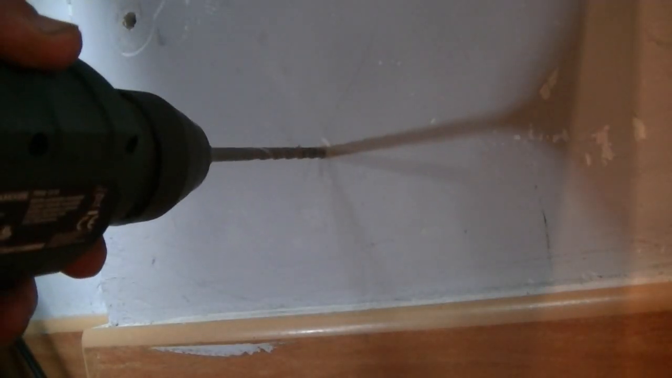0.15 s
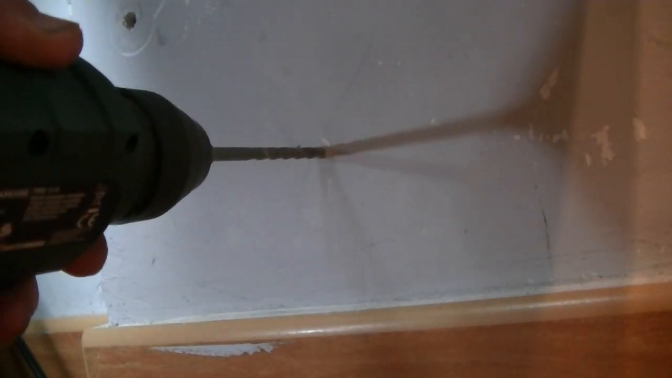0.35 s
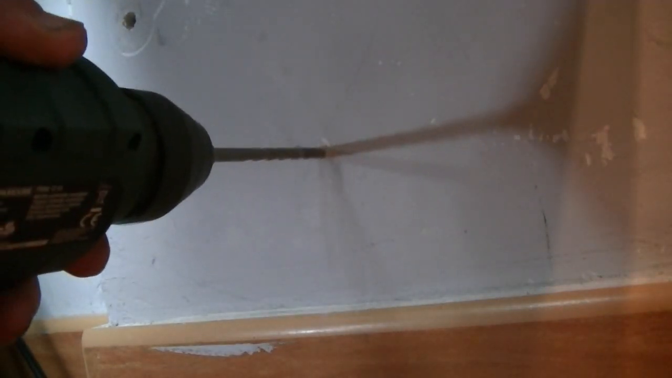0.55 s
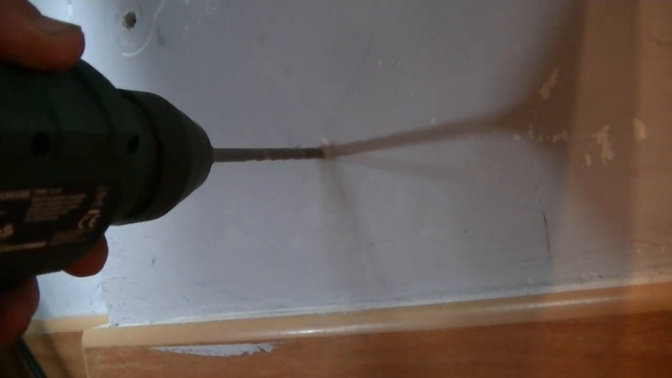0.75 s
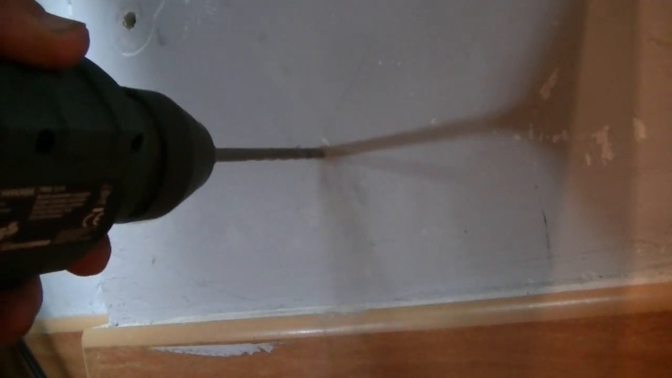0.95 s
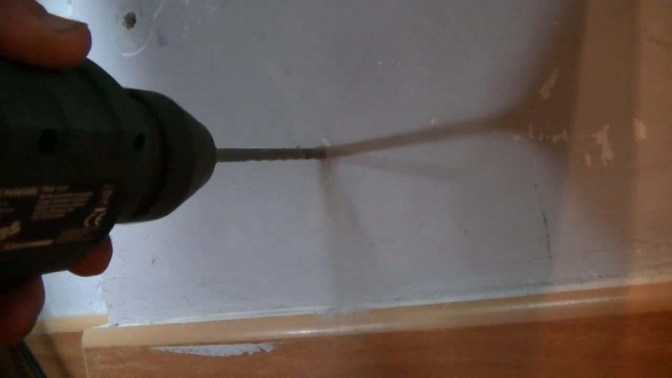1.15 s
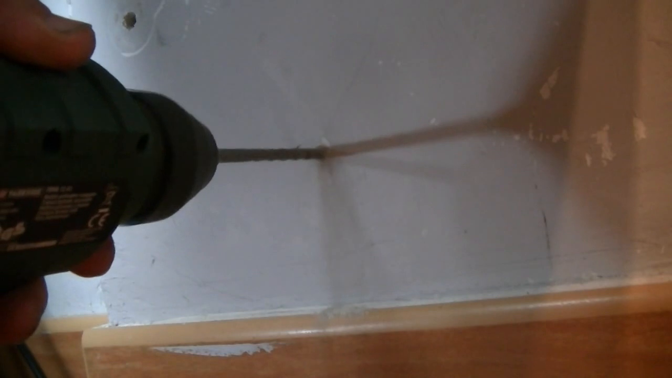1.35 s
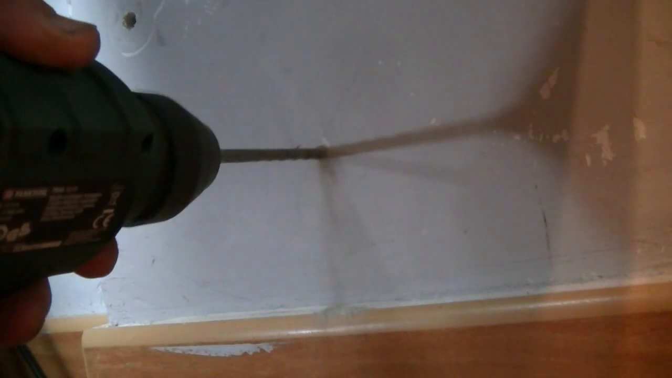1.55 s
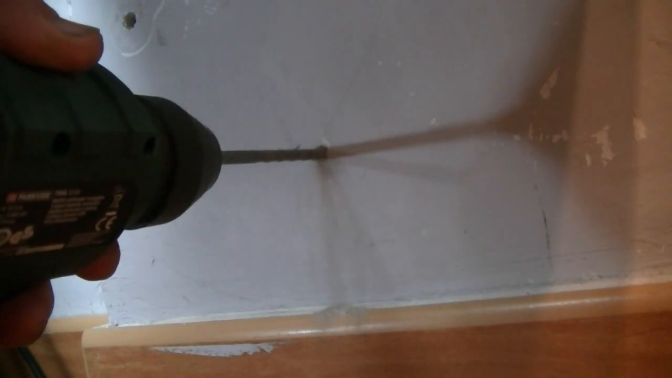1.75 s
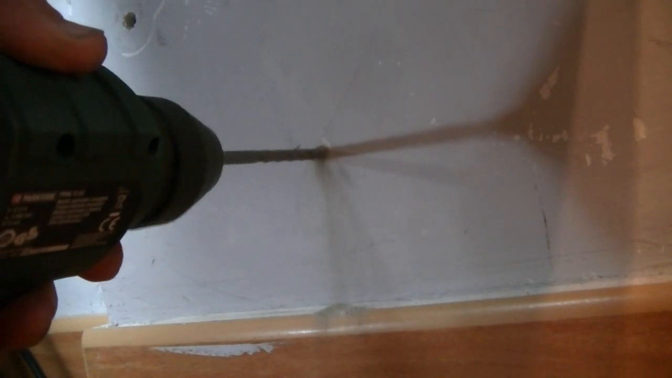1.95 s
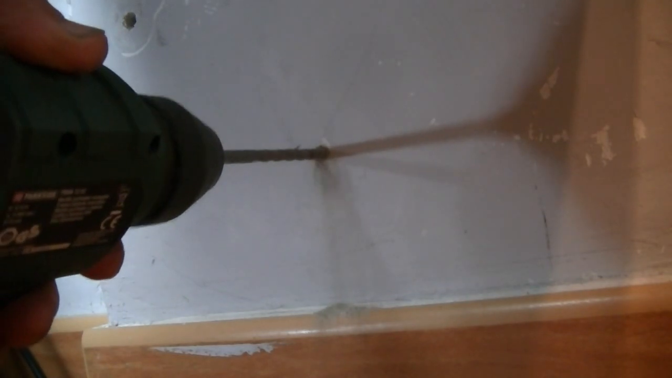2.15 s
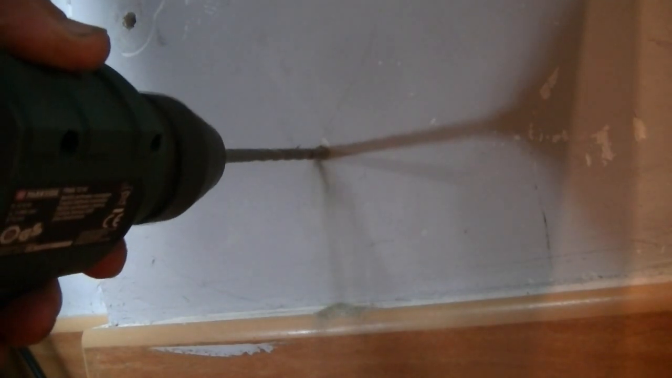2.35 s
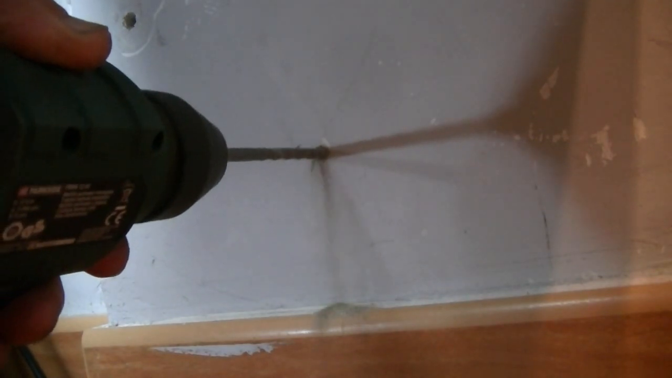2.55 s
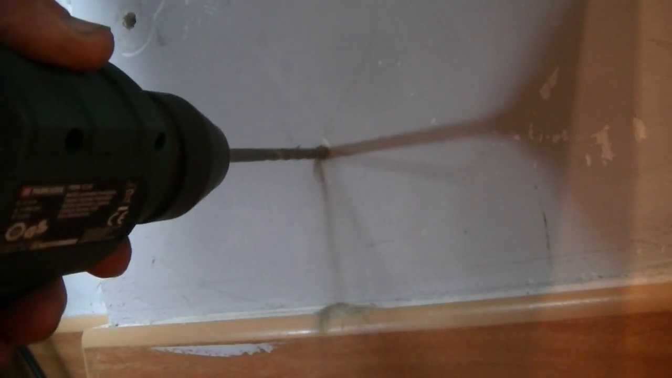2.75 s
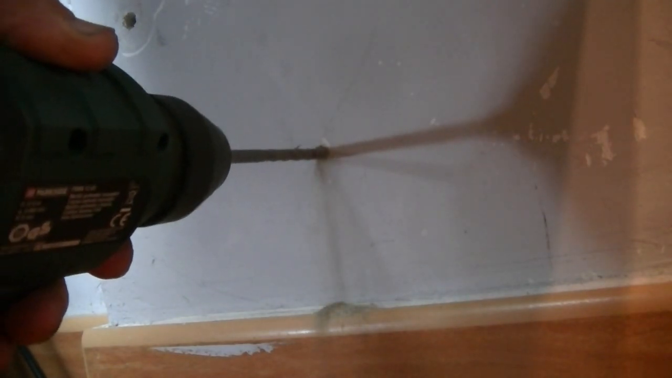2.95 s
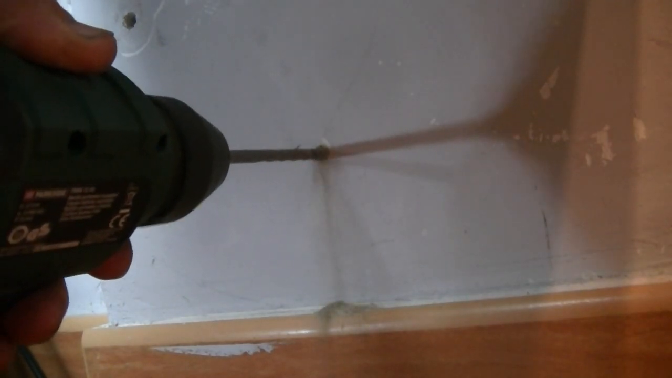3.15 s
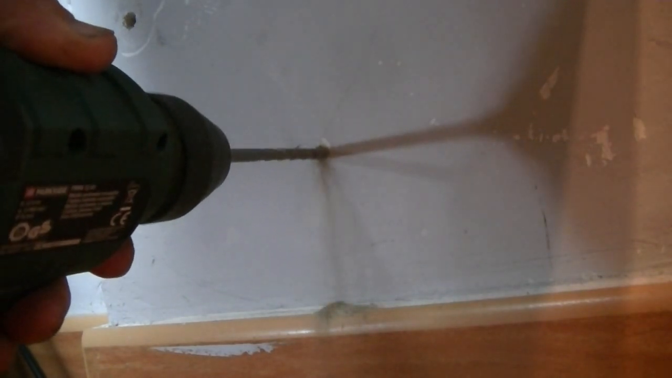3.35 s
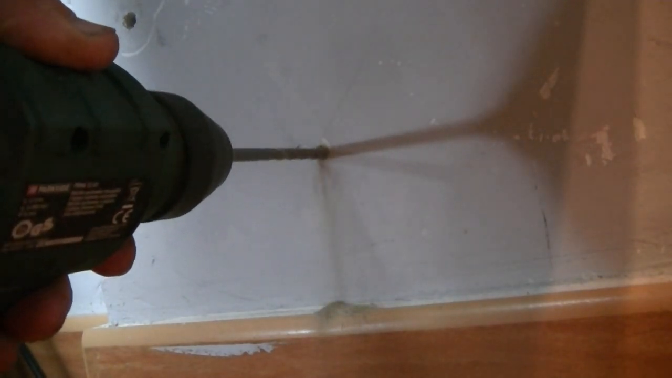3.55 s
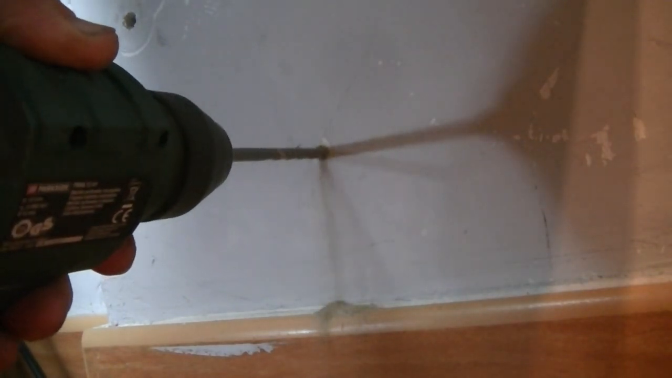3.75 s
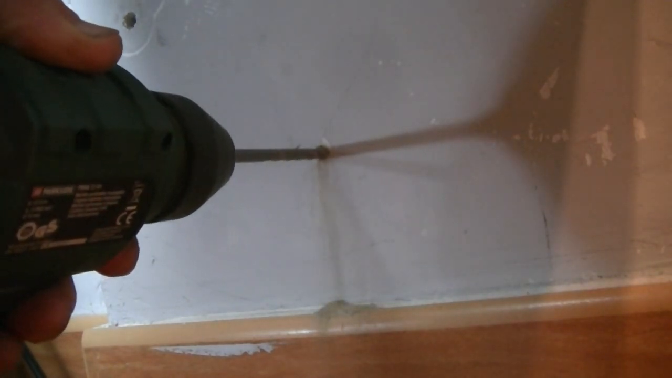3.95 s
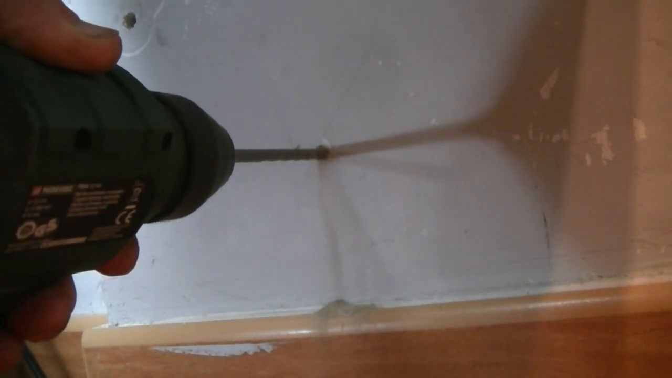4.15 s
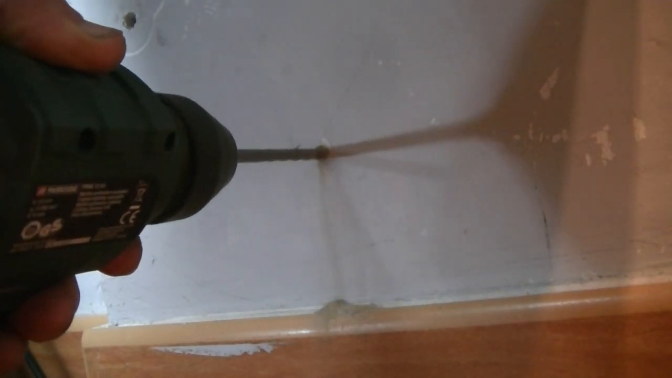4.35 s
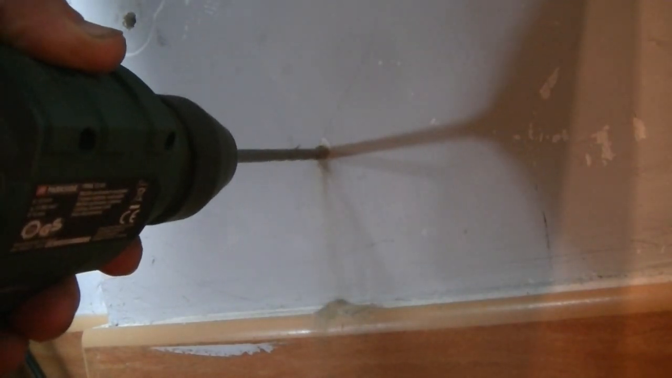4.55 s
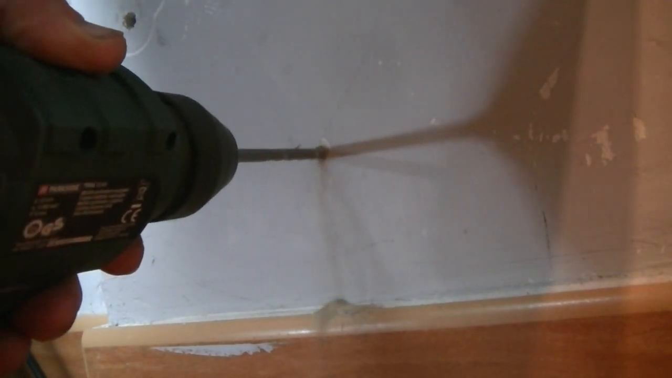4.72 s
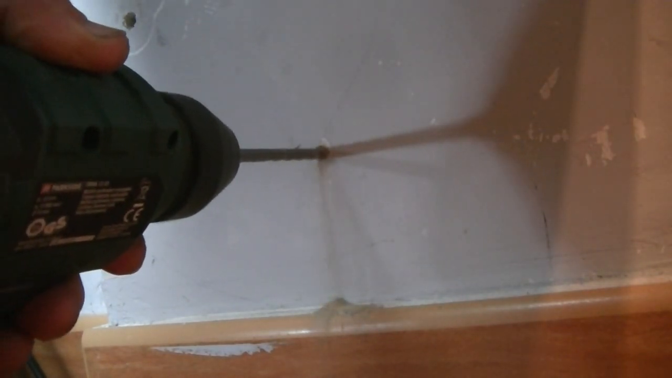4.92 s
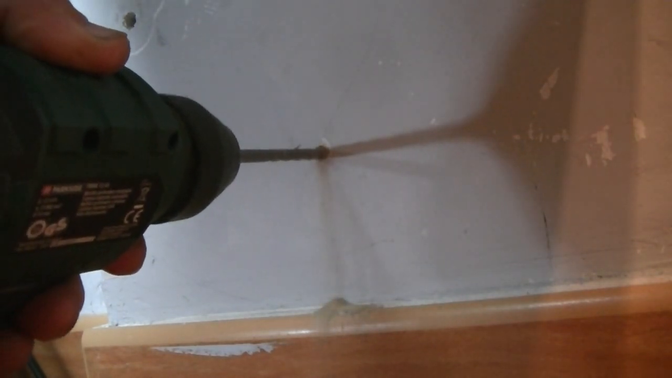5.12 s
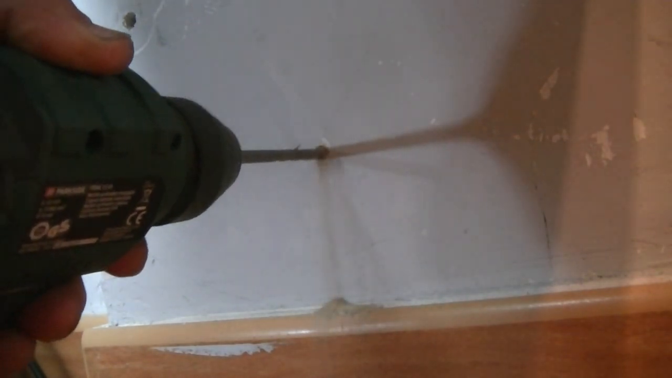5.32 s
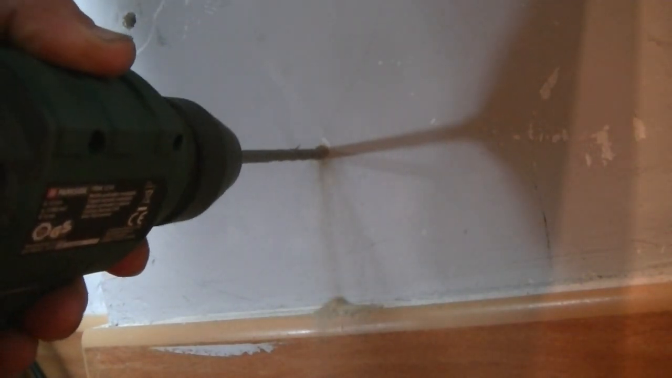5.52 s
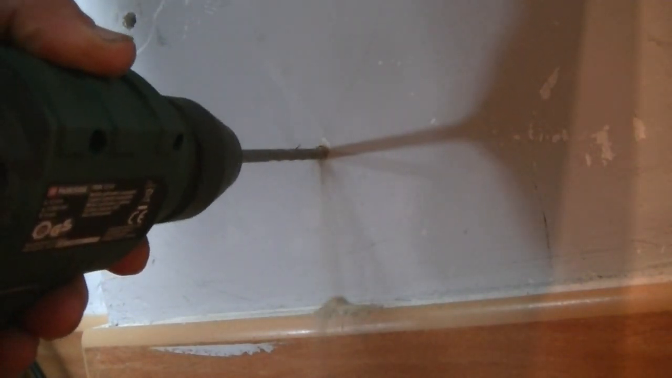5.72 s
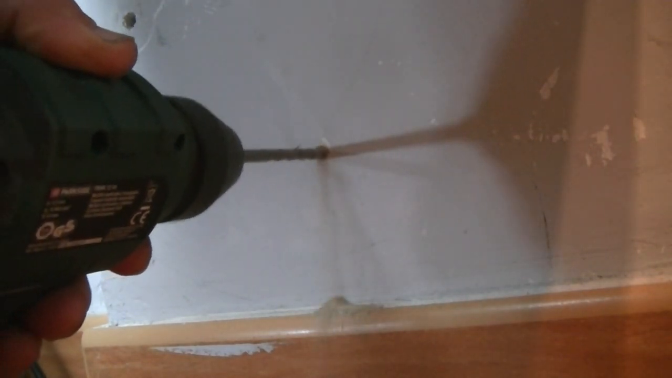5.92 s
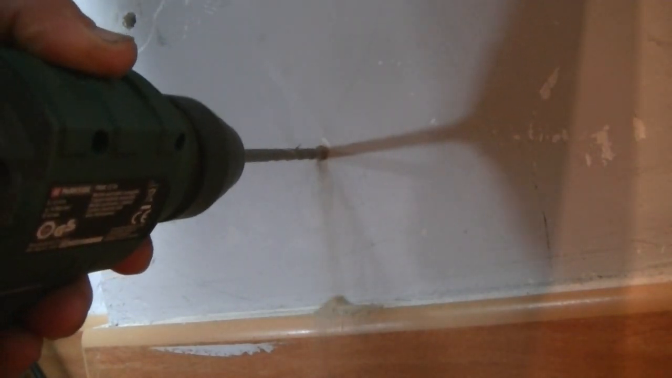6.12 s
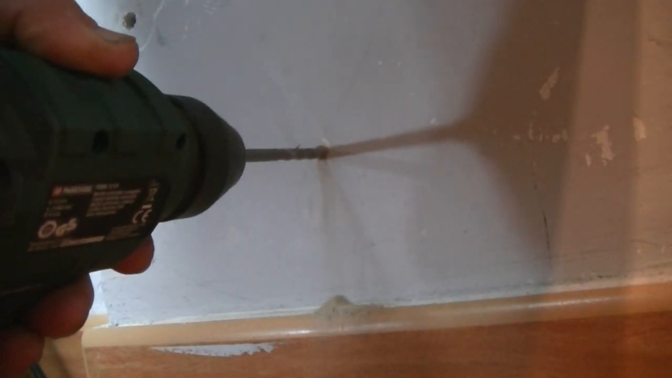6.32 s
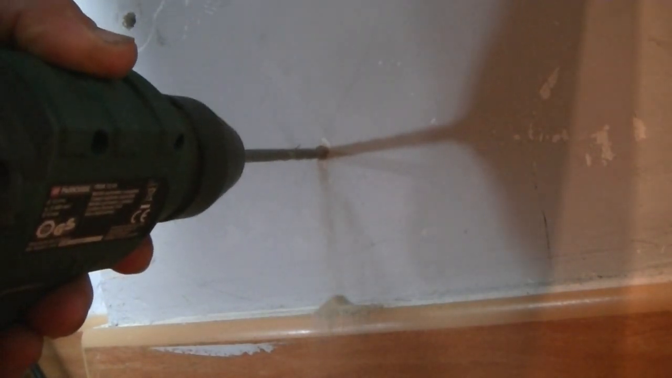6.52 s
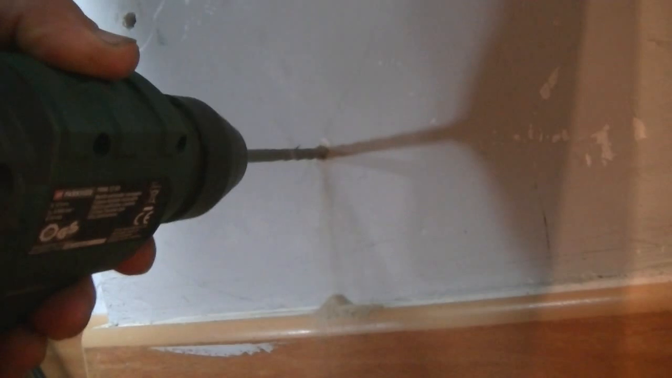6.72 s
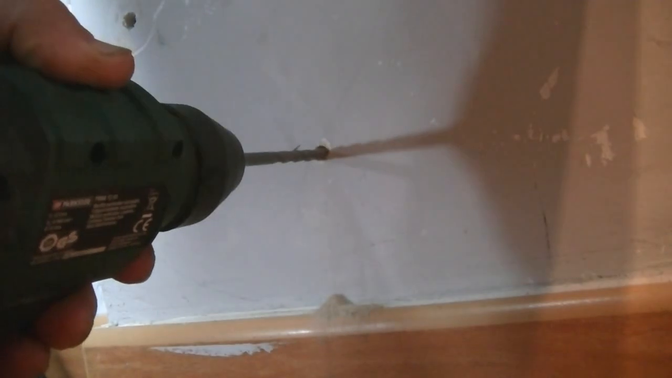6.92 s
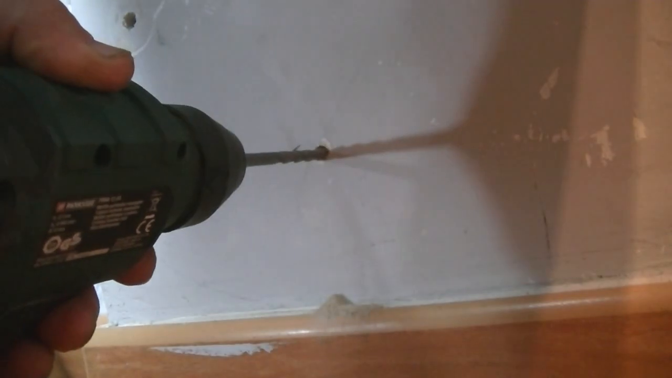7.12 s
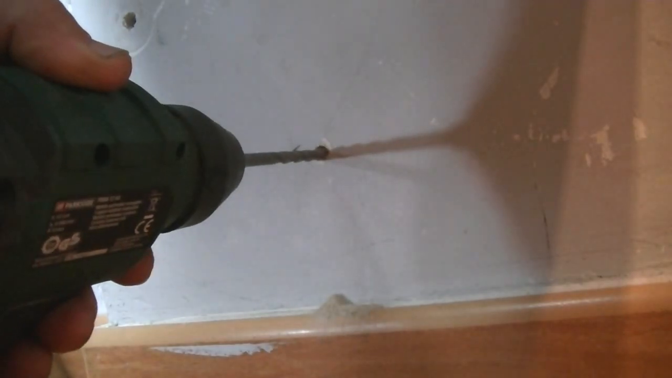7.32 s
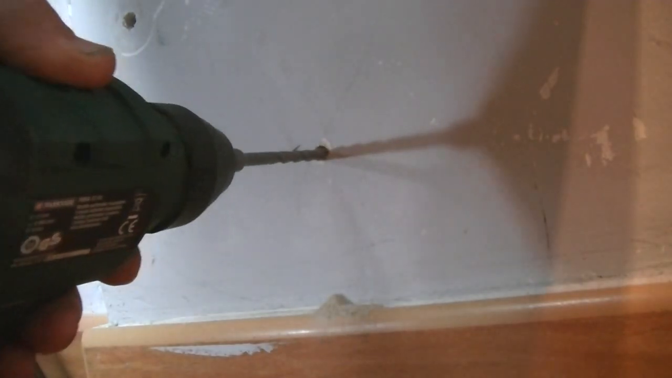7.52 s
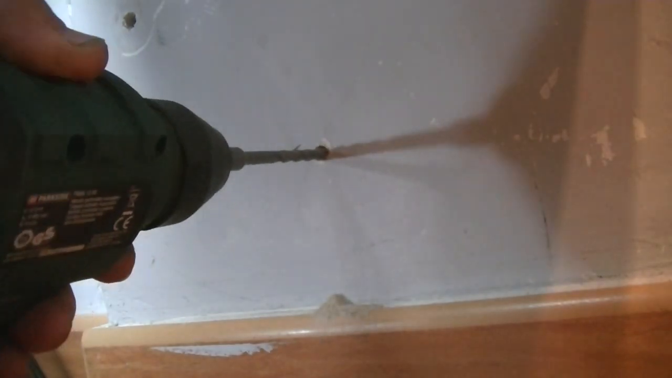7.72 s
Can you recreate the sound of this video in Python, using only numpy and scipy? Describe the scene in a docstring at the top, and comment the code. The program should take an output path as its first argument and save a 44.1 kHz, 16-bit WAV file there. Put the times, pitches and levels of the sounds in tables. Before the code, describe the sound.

Close in a small room, a hammer drill ratchets up to a harsh steady roar in a wall, stalls suddenly, and its bit scrapes loose quietly.

```python
"""A hammer drill bores into a plastered wall, close by in a small room: slow ratcheting, then full speed.
Each stroke rings wall, handle, housing and chuck, clacks the bit and crushes plaster: noise puffs and resonances.
Gear sines whine and shaped noise makes the motor's rush. The trigger is let go and the drill stalls.
The bit slips, scrapes and knocks out of the hole in noise and short ringing tones; a soft hiss swells up."""
import sys
import numpy as np
from scipy import signal
from scipy.fft import rfft, irfft, next_fast_len
from scipy.io import wavfile
from scipy.ndimage import map_coordinates

SR = 44100
rng = np.random.default_rng(int(sys.argv[2]) if len(sys.argv) > 2 else 0)


def persist_wave(psi):
    """Save psi, clipped to +-1, as 16-bit WAV."""
    counts = np.round(np.clip(psi, -1, 1) * 32767).astype(np.int16)
    wavfile.write(sys.argv[1], SR, np.atleast_2d(counts).T)


N = 347508

# Resonances: f/Hz, width/Hz, relative level/dB
# drill housing
HOUSING_MODES = [(737, 78, -14.5), (941, 25, -5), (1203, 28, -3.5), (1289, 30, -5.5), (1426, 43, -6.5),
                 (1710, 73, -2), (1868, 74, -3), (1982, 102, 4.5), (2200, 57, -18.5), (2416, 120, -4),
                 (2546, 80, -4.5), (2651, 51, 1.5), (2870, 44, -4.5), (3346, 160, -4)]
# struck wall: f/Hz, width/Hz, relative level/dB
WALL_MODES = [(468.6, 69, 0.5), (551, 58, 0.5), (638, 47.5, -2.5), (669, 49, -12.5)]
# hollow handle: f/Hz, width/Hz, relative level/dB
GRIP_MODES = [(206, 61, 11.5), (253, 33, -11)]
# ratchet teeth: f/Hz, width/Hz, relative level/dB
TEETH_MODES = [(1840, 1760, 0)]
# chuck: f/Hz, width/Hz, relative level/dB
CHUCK_MODES = [(418, 30, -11.5), (682, 57, -11.5), (739, 40, -5.5), (870, 97, -10), (966, 47, 0.5),
               (1220, 190, -5.5), (1445, 72, 4.5), (1980, 120, -8), (2350, 80, -13.5), (3270, 110, -3)]
# bearing: f/Hz, width/Hz, relative level/dB
BEARING_MODES = [(3800, 170, 3), (4050, 110, -6)]
# steel tip of the bit: f/Hz, width/Hz, relative level/dB
TIP_MODES = [(9860, 470, 5.5), (10180, 290, -2.5)]
# steel shank of the bit: f/Hz, width/Hz, relative level/dB
SHANK_MODES = [(13500, 225, -9.5), (14170, 250, -16.5)]
# bit rubbing in the hole: f/Hz, width/Hz, relative level/dB
FLUTE_MODES = [(1750, 300, -11), (2490, 180, 1.5), (3240, 250, -2), (4400, 500, -9.5), (5260, 300, -16),
               (6600, 700, -12), (8440, 500, -13)]
# faint resonances in the hiss: f/Hz, width/Hz, relative level/dB
HISS_RESONANCES = [(388, 120, -3.5), (2190, 130, 0.5), (3040, 45, -4), (3640, 110, -4), (3890, 120, -2.5),
                   (5240, 70, -8)]

# Noise colours: f/Hz, relative spectral level/dB
# loose metal of the stroke
CLACK_COLOUR = [(200, -78), (380, -39.5), (600, -7.5), (1000, -7.5), (1500, -6.5), (2000, 5), (2700, -4),
                (3100, -4), (3700, 4.5), (4700, -6.5), (6200, -6.5), (8000, -14.5), (10000, -18.5),
                (16000, -45.5)]
# plaster breaking under the tip: f/Hz, relative spectral level/dB
CRUSH_COLOUR = [(300, -91), (1000, -41), (4000, -18), (6500, -0.5), (8000, -3), (10500, 2.5), (12000, -5),
                (14500, -6), (16000, -24.5)]
# fan and brushes: f/Hz, relative spectral level/dB
MOTOR_COLOUR = [(170, -70.5), (300, -29.5), (450, -11), (800, -7), (1300, -1.5), (2000, 3), (2700, -0.5),
                (3050, -2), (3400, -4.5), (4400, -2.5), (5000, -7.5), (6500, -13.5), (9000, -17),
                (15500, -31.5)]
# bit scraping: f/Hz, relative spectral level/dB
SCRAPE_COLOUR = [(200, -48), (700, -13), (2500, -3.5), (5000, -9), (8800, -21), (10500, -29), (15000, -64)]
# bit slipping back: f/Hz, relative spectral level/dB
RUB_COLOUR = [(200, -41.5), (500, -22.5), (700, -8), (1100, -4), (1800, -6), (2450, -9), (3200, -12),
              (5000, -24), (11000, -33), (15000, -67)]
# sharp contact of a knock: f/Hz, relative spectral level/dB
KNOCK_COLOUR = [(150, -40.5), (450, -9.5), (800, -18), (1300, -1.5), (2000, -8.5), (3400, -4), (5400, -19),
                (9600, -23.5), (15600, -46)]
# soft hiss: f/Hz, relative spectral level/dB
HISS_COLOUR = [(25, -37), (140, -40), (250, -24), (340, -16), (385, -3.5), (430, -10), (650, -12),
               (1100, -13), (2200, -10.5), (4000, -16), (5400, -21), (6200, -26), (8500, -30), (15600, -57)]

# gear mesh: multiple of the stroke rate, relative level/dB
GEAR_PARTIALS = [(57, -14), (58, -10), (62, -11), (64, 0), (65, -2), (128, -17)]
# the drill settling in the hole: f/Hz, relative level/dB, t60/s
RIM_TONES = [(420, -9, .12), (674, 0, 0.098), (790, -10, .08), (1400, -6, 0.043), (2430, -9, .05)]
# knocks of the loosened drill: t/s, sharp contact level/dB, contact t60/s, hollow ring level/dB
KNOCK_EVENTS = [(7.0078, -63, .03, -48), (7.0632, -58, 0.033, -52), (7.5676, -30, .015, -55),
                (7.569, -30.5, 0.038, -62), (7.5865, -41.5, .025, -60)]
# the bit scrapes out of the hole: t/s, length/s, level/dB
SCRAPE_EVENTS = [(7.381, .016, -49), (7.396, 0.02, -45.5), (7.424, 0.018, -44), (7.448, .012, -49.5),
                 (7.602, 0.023, -55), (7.855, 0.043, -49)]
# decay of the room: f/Hz, t60/s
ROOM_DECAY = [(200, 0.39), (1000, 0.22), (4000, 0.27), (10000, 0.037), (16000, 0.12)]
# the trigger is squeezed halfway, then fully: t/s, share of full speed
TRIGGER_STEPS = [(0, .5613), (.5224, 1)]
# full speed as the drag of the hole allows it: t/s, strokes per second
FULL_SPEED_CURVE = [(0.6, 66.001), (1.3, 66.374), (2.08, 66.783), (2.25, 67.577), (2.58, 66.63),
                    (2.78, 67.432), (3.9, 67.417), (5.7, 66.981), (6.6, 66.324)]
# how hard the drill is leant on: t/s, working level/dB
EFFORT_CURVE = [(0.7, -21.5), (1.53, -19.5), (3.28, -21), (6.47, -22), (6.65, -22.5)]
# the tip meets harder and softer plaster: t/s, level/dB
BITE_CURVE = [(0.05, -37.5), (0.71, -39), (1.54, -44.5), (2.87, -39), (4.25, -43.5), (6.62, -43),
              (6.66, -40.5)]

# each part against the effort:
# level/dB, change per octave of speed/dB, change at the full depth of the hole/dB
WALL_LAW = (-15, 4.4, -.3)
GRIP_LAW = (-53, -7, 1.3)
WHINE_LAW = (-8.5, 11, -9.5)
BEARING_LAW = (-33.5, 2.5, 17)
SHANK_LAW = (-23.5, -1.5, -16.5)
CHUCK_LAW = (-27.5, -1.5, .8)

START_SHARE, SPIN_UP_S = .2926, .0511  # share of full speed at the outset, lag of the motor
RELEASE_S, COAST_S = 6.691, .1695  # the trigger is let go, and the motor coasts down
STALL_S = 6.795  # the last strokes come before this
SKID_DB, SKID_S = 6.5, 0.1  # the first strokes clatter harder, then settle
SEATED_S, GUIDE_S = 0.49, 0.93  # the bit runs free until the deepening hole guides it
LOOSE_CHUCK_DB, LOOSE_WORK_DB = 23.5, 1  # extra rattle of chuck and mechanism while it runs free
# the bit slips back: peak, swell and fade
SLIP_S, SLIP_DB, SLIP_RISE_DB_PER_S, SLIP_FALL_DB_PER_S = 7.085, -47.5, 400, 170
HISS_FULL_S, HISS_DB, HISS_RISE_DB_PER_S = 7.61, -54.5, 25  # the hiss swells, then holds
PEAK_DB, TOP_HZ = -3, 15800  # where peaks round off, and the band limit


def amp(db):
    """Decibels to gain."""
    return 10 ** (np.asarray(db) / 20)


def unit(x):
    """x at rms 1."""
    return x / np.sqrt(np.mean(x ** 2) + 1e-20)


def along(points, hz):
    """Read (Hz, value) points on a log frequency axis, holding the end values."""
    f, v = np.transpose(points)
    return np.interp(np.log(hz + 1), np.log(f + 1), v)


def clock():
    """The time of each sample in seconds."""
    return np.arange(N) / SR


def curve(points):
    """(s, value) points as one value per sample."""
    s, value = np.transpose(points)
    return np.interp(clock(), s, value)


def white():
    """Fresh white noise."""
    return rng.standard_normal(N)


def wobble(rate):
    """A smooth random curve, rate knots a second."""
    knots = rng.standard_normal(int(N * rate / SR) + 4)
    return map_coordinates(knots, [clock() * rate])


def filtered(x, response):
    """x times a complex response of frequency."""
    m = next_fast_len(N + SR // 2, real=True)
    return irfft(rfft(x, m) * response(np.fft.rfftfreq(m, 1 / SR)), m)[..., :N]


def coloured(x, spectrum):
    """x shaped by (Hz, dB) points; white noise keeps its power."""
    gains = amp(along(spectrum, np.linspace(0, SR / 2, 2000)))
    norm = np.sqrt(np.mean(gains ** 2))
    return filtered(x, lambda hz: amp(along(spectrum, hz)) / norm)


def highpass(x, low_hz):
    """x through the weak bass radiation of a small body."""
    return signal.sosfilt(signal.butter(4, low_hz, "high", fs=SR, output="sos"), x)


def ring(x, modes, low_hz):
    """x through resonances that radiate little below low_hz, at rms 1."""
    def body(f):
        total = 0
        for k, (centre, width, db) in enumerate(modes):
            damping = 1j * f * width
            total = total + (-1) ** k * amp(db) * damping / (centre ** 2 - f * f + damping)
        return total
    return unit(highpass(filtered(x, body), low_hz))


def taps(times, sizes):
    """Impulses at times that may fall between samples."""
    at = np.clip(times * SR, 0, N - 2)
    i = at.astype(int)
    return np.bincount(i, sizes * (1 - at + i), N) + np.bincount(i + 1, sizes * (at - i), N)


def hits(times, delay, scatter, spread_db):
    """One impulse a delay (s) from each stroke, uneven in time (s) and size."""
    chance = rng.standard_normal((len(times), 2))
    return taps(times + delay + scatter * chance[:, 0], amp(spread_db * chance[:, 1]))


def bursts(impulses, decay):
    """Each impulse sets off a dying puff of noise; decay in seconds."""
    envelope = signal.lfilter([1], [1, -np.exp(-1 / (decay * SR))], impulses)
    return unit(white() * envelope)


def repeated(impulses, decay):
    """Each impulse sets off the same dying jumble of dense metal modes; decay in seconds."""
    t = np.arange(SR // 40) / SR
    jumble = rng.standard_normal(len(t)) * np.exp(-t / decay)
    return unit(signal.fftconvolve(impulses, jumble)[:N])


def drill():
    """The ratchet sets the pace: strokes excite body and bit, while motor and gears run between them."""
    speed = ratchet_speed()
    turns = np.cumsum(speed) / SR + .5  # strokes so far
    strokes = clock()[1:][np.diff(np.floor(turns)) > 0]
    strokes = strokes[strokes < STALL_S]
    running = amp(-500 * np.maximum(clock() - STALL_S, 0))
    return hammering(strokes, speed) + bit(strokes, speed) + running * (motor(turns) + gears(turns, speed))


def ratchet_speed():
    """Strokes per second: the motor follows the trigger with a lag and coasts down on release."""
    t = clock()
    times, shares = np.transpose(TRIGGER_STEPS)
    share = START_SHARE
    for s, step in zip(times, np.diff(shares, prepend=START_SHARE)):
        share = share + step * (1 - np.exp(-np.maximum(t - s, 0) / SPIN_UP_S))
    coast = np.exp(-np.maximum(t - RELEASE_S, 0) / COAST_S)
    return curve(FULL_SPEED_CURVE) * share * coast


def looseness():
    """How freely the bit runs: 1 at first, dying away as the hole guides it."""
    return np.exp(-np.maximum(clock() - SEATED_S, 0) / GUIDE_S)


def working_level():
    """dB of the mechanism: the effort, plus early looseness and skidding."""
    return curve(EFFORT_CURVE) + LOOSE_WORK_DB * looseness() + SKID_DB * np.exp(-clock() / SKID_S)


def part_level(law, speed):
    """dB of one part: it follows the effort, and speed and hole depth in its own way."""
    db, speed_db, depth_db = law
    octaves = np.log2(speed / speed.max())
    depth = np.minimum(clock() / STALL_S, 1)
    return curve(EFFORT_CURVE) + db + speed_db * octaves + depth_db * depth


def hammering(strokes, speed):
    """The ramp shoves, the teeth drop together, the bit lands, and the teeth catch half a stroke later."""
    work_db = working_level()
    period = 1 / np.interp(strokes, clock(), speed)
    shove = hits(strokes, delay=-0.00298, scatter=.00003, spread_db=1.07)
    drop = hits(strokes, delay=-.0016, scatter=.000025, spread_db=1)
    land = hits(strokes, delay=-.0003, scatter=.00005, spread_db=1.2)
    catch = hits(strokes, delay=.47 * period, scatter=.00008, spread_db=3)
    wall = amp(part_level(WALL_LAW, speed)) * ring(shove, WALL_MODES, low_hz=352)
    grip = amp(part_level(GRIP_LAW, speed)) * ring(shove, GRIP_MODES, low_hz=191)
    teeth = amp(work_db - 12.2) * ring(drop + .35 * catch, TEETH_MODES, low_hz=600)
    housing = amp(work_db - 5.5) * ring(drop + 0.13 * catch, HOUSING_MODES, low_hz=560)
    chuck_db = part_level(CHUCK_LAW, speed) + LOOSE_CHUCK_DB * looseness()
    chuck = amp(chuck_db) * ring(land, CHUCK_MODES, low_hz=533)
    clatter = 0.38 * drop + land + 0.27 * catch
    clack = amp(work_db - 8.0) * coloured(rattle(clatter), CLACK_COLOUR)
    puffs = bursts(clatter, decay=.002)
    bearing = amp(part_level(BEARING_LAW, speed)) * ring(puffs, BEARING_MODES, low_hz=2000)
    return wall + grip + teeth + housing + chuck + clack + bearing


def rattle(clatter):
    """More alike from stroke to stroke in the low modes, looser rattle higher up."""
    def alike(hz):
        return along([(2400, .55), (3400, .12)], hz)  # share of power that repeats
    steady = filtered(repeated(clatter, decay=0.0029), lambda hz: np.sqrt(alike(hz)))
    loose = filtered(bursts(clatter, decay=0.0031), lambda hz: np.sqrt(1 - alike(hz)))
    return steady + loose


def bit(strokes, speed):
    """The tip crushes plaster in puffs of noise, and the steel of tip and shank rings."""
    bite_db = curve(BITE_CURVE)
    bite = hits(strokes, delay=0, scatter=0.00015, spread_db=2)
    crush = amp(bite_db + 0.4) * coloured(bursts(bite, decay=0.0017), CRUSH_COLOUR)
    tip = amp(bite_db - 1.5) * ring(bursts(bite, decay=0.003), TIP_MODES, low_hz=4960)
    shank_ring = ring(bursts(bite, decay=.001), SHANK_MODES, low_hz=8000)
    return crush + tip + amp(part_level(SHANK_LAW, speed)) * shank_ring


def motor(turns):
    """Fan and brushes rush, eased for a moment after each blow."""
    load = 1 + 0.39 * np.cos(2 * np.pi * (turns - .75))
    return amp(working_level() - 5.5) * load * coloured(white(), MOTOR_COLOUR)


def gears(turns, speed):
    """The gear mesh sings in unsteady sines, swelling each time the ratchet climbs its ramp."""
    shaft = turns + .0012 * wobble(130) + .0025 * wobble(14)
    mesh = 0
    for multiple, db in GEAR_PARTIALS:
        mesh = mesh + amp(db + 0.54 * wobble(25)) * np.sin(2 * np.pi * multiple * (shaft - .8))
    climb = amp(3 * np.cos(2 * np.pi * (turns - .8)))
    return amp(part_level(WHINE_LAW, speed)) * unit(mesh * climb)


def withdrawal():
    """The stopped bit slips back, scrapes along the hole and knocks on its rim."""
    return slip() + scrapes() + knocks()


def slip():
    """The bit slides back: rubbing noise and one flute resonance swell and fade."""
    t = clock()
    rise = SLIP_RISE_DB_PER_S * (SLIP_S - t)
    fall = SLIP_FALL_DB_PER_S * (t - SLIP_S)
    slide_db = SLIP_DB - np.maximum(rise, fall)
    rub = 0.92 * coloured(white(), RUB_COLOUR) + .5 * ring(white(), FLUTE_MODES[1:2], low_hz=800)
    return amp(slide_db + 2 * wobble(200)) * rub


def scrapes():
    """Short drags of the bit: gritty noise and flute resonances under flickering envelopes."""
    t = clock()
    drags = 0
    for s, length, db in SCRAPE_EVENTS:
        attack = np.clip((t - s) / .003, 0, 1)
        fade = amp(-1500 * np.maximum(t - s - length * 0.63, 0))
        drags = drags + amp(db) * attack * fade
    grit = .8 * ring(white(), FLUTE_MODES, low_hz=800) + 0.64 * coloured(white(), SCRAPE_COLOUR)
    return drags * amp(1.9 * wobble(500)) * grit


def knocks():
    """Each knock is a sharp contact of dying noise and a short hollow ring of dying sines."""
    t = clock()
    contact = sum((t >= s) * amp(db - 60 * np.abs(t - s) / t60) for s, db, t60, _ in KNOCK_EVENTS)
    times, _, _, ring_db = np.transpose(KNOCK_EVENTS)
    age = t[:SR // 4]
    modes = sum(amp(db - 60 * age / t60) * np.sin(2 * np.pi * hz * age) for hz, db, t60 in RIM_TONES)
    hollow = signal.fftconvolve(taps(times, amp(ring_db)), modes)[:N]
    return coloured(contact * white(), KNOCK_COLOUR) + highpass(hollow, 380)


def hiss():
    """A soft, slightly ringing noise swells steadily, then holds after the drill is silent."""
    hiss_db = HISS_DB - HISS_RISE_DB_PER_S * np.maximum(HISS_FULL_S - clock(), 0)
    air = amp(-1) * coloured(white(), HISS_COLOUR)
    return amp(hiss_db) * (air + amp(-6.0) * ring(white(), HISS_RESONANCES, low_hz=300))


def room(x):
    """Two unlike answers of the small room: noise tails dying at a rate set by frequency."""
    hz, t, z = signal.stft(rng.standard_normal((2, SR // 2)), SR, nperseg=256)
    decay = amp(-60 * t / along(ROOM_DECAY, hz)[:, None])
    tail = signal.istft(z * decay, SR, nperseg=256)[1]
    return signal.fftconvolve(x[None], tail / np.linalg.norm(tail[0]), axes=1)[:, :N]


def rumble():
    """A faint low stereo noise, 14 dB weaker once the drill has stalled."""
    pair = white() + .45 * np.array([white(), white()])  # partly shared by both channels
    low = coloured(pair, [(20, -0.5), (150, -6.5), (400, -13.5), (1500, -74.5)])
    return amp(-85.0) * low * amp(-14 * (clock() > STALL_S))


def scene():
    """Drill and wall close by, heard almost in mono, with room and hiss spread wider."""
    direct = drill() + withdrawal()
    near, across = amp(-14.0) * room(direct)
    mid = direct + near + hiss()
    side = amp(-7.5) * across + amp(-31) * direct + amp(-11) * hiss()
    return np.array([mid + side, mid - side])


def record(dry):
    """Round off the highest peaks, add the low rumble and cut everything above the band limit."""
    limited = dry / (1 + np.abs(dry / amp(PEAK_DB)) ** 6) ** (1 / 6)
    # only the excess above 600 Hz is shaved: the bass passes untouched
    rounded = dry - filtered(dry - limited, lambda hz: hz > 600)
    return filtered(rounded + rumble(), lambda hz: hz < TOP_HZ)


dry = scene()
out = record(dry)
persist_wave(out)
```